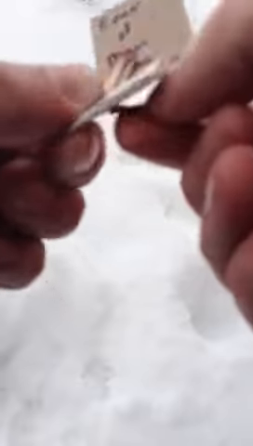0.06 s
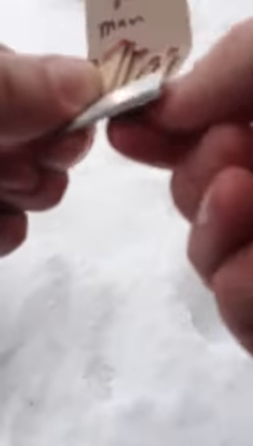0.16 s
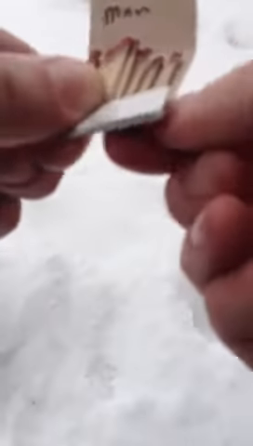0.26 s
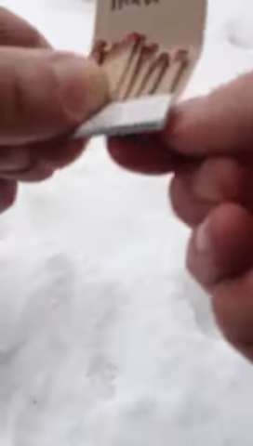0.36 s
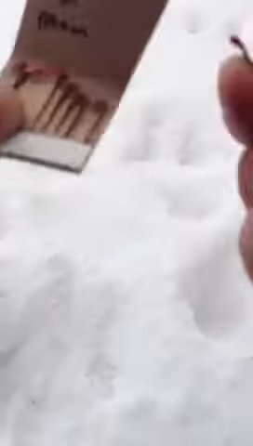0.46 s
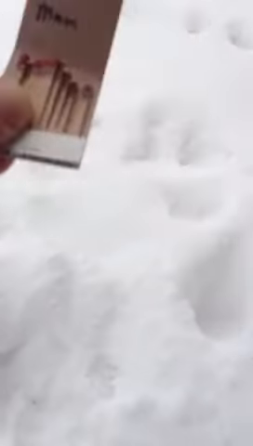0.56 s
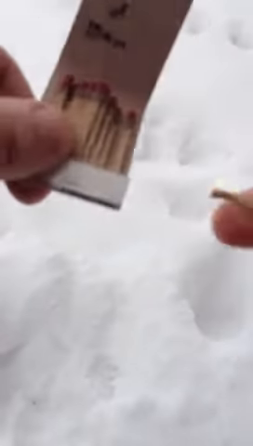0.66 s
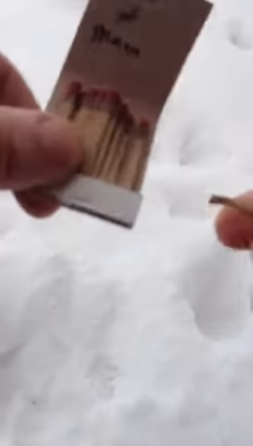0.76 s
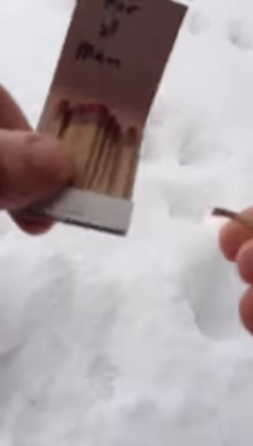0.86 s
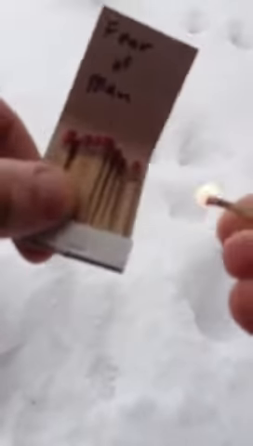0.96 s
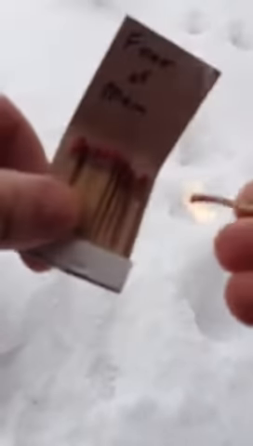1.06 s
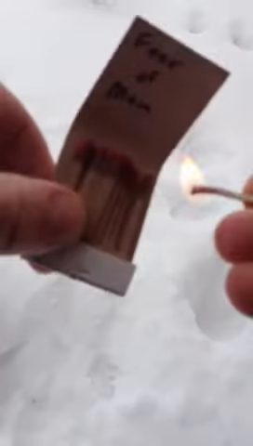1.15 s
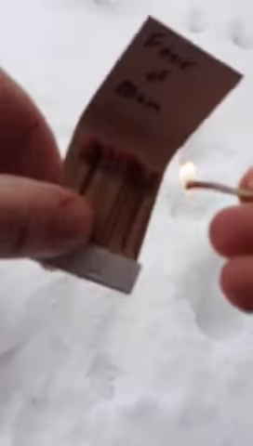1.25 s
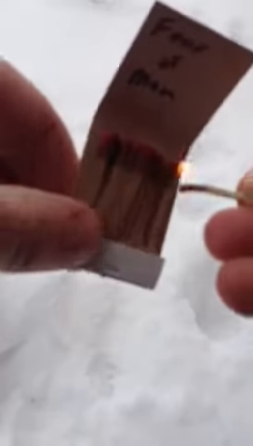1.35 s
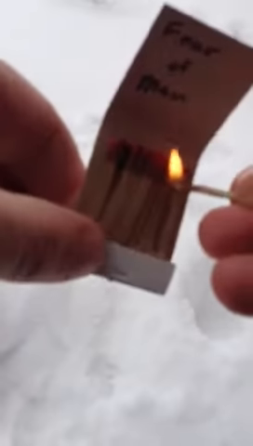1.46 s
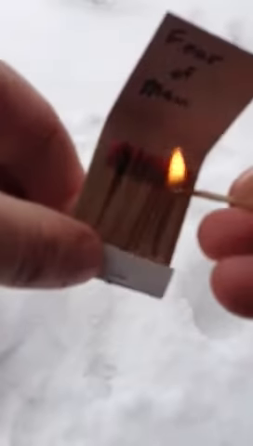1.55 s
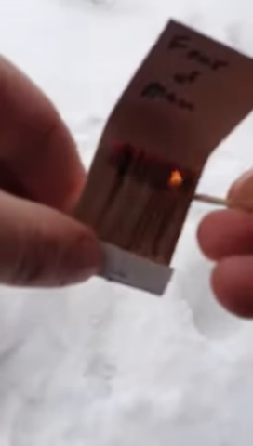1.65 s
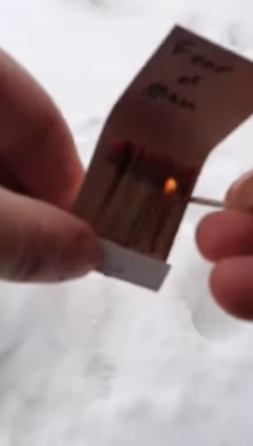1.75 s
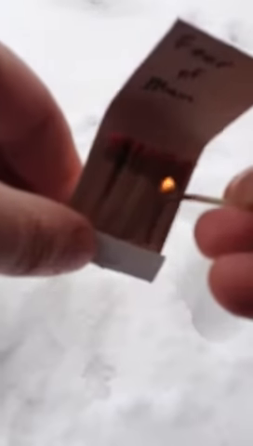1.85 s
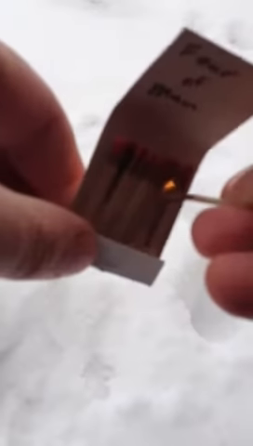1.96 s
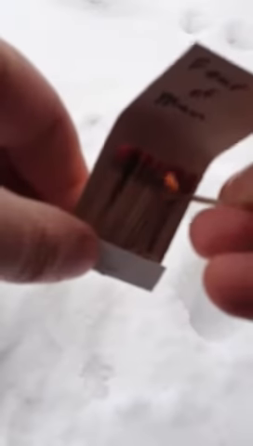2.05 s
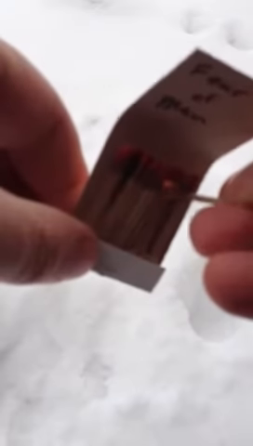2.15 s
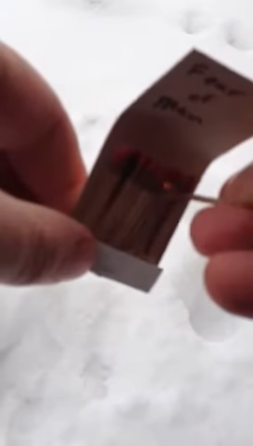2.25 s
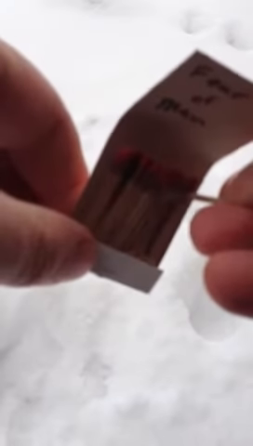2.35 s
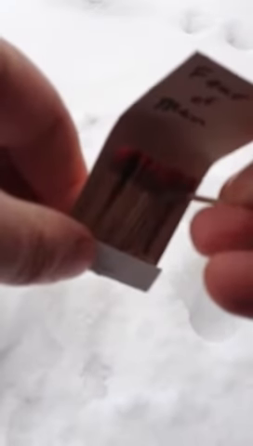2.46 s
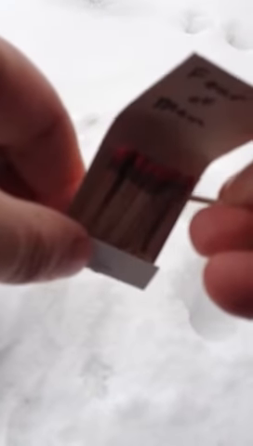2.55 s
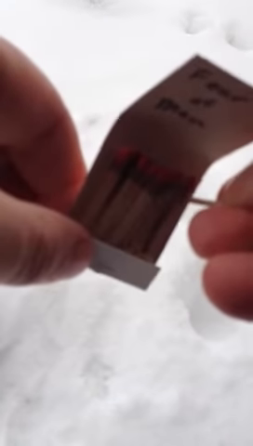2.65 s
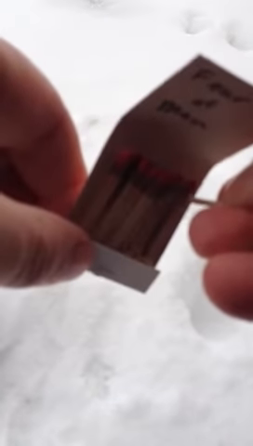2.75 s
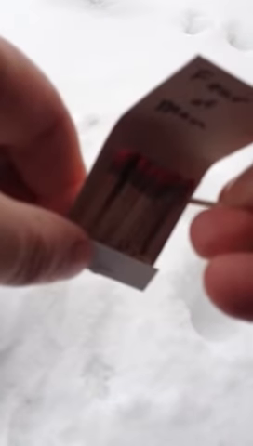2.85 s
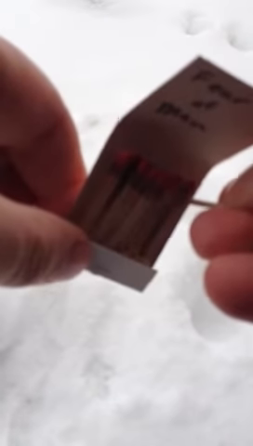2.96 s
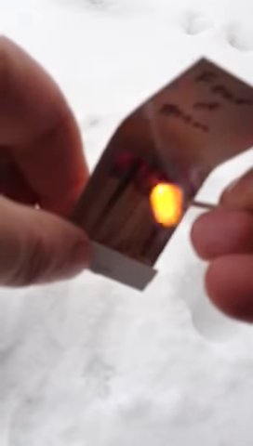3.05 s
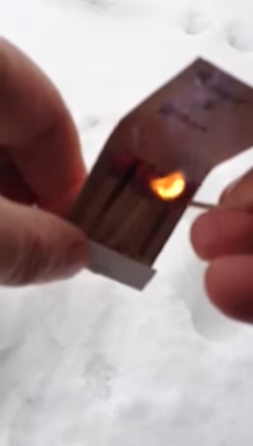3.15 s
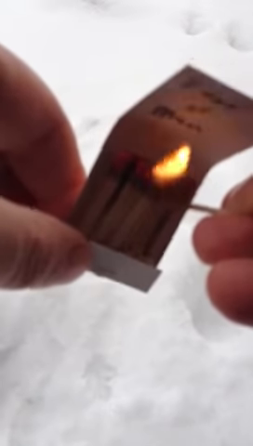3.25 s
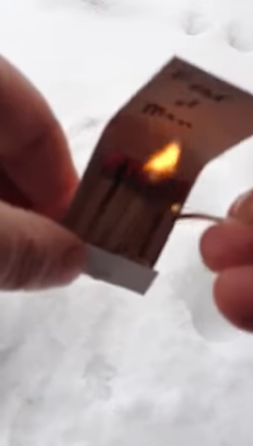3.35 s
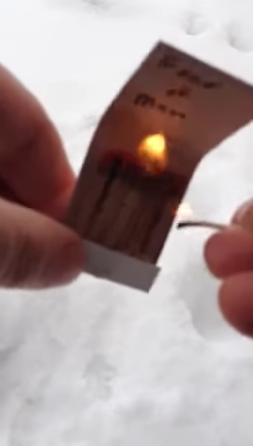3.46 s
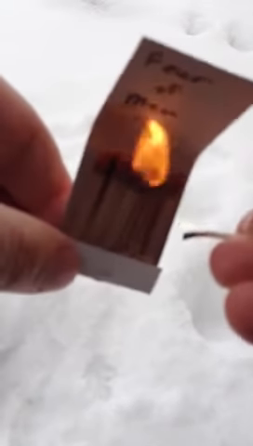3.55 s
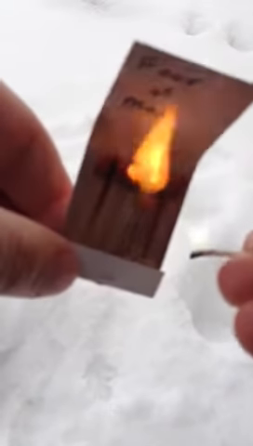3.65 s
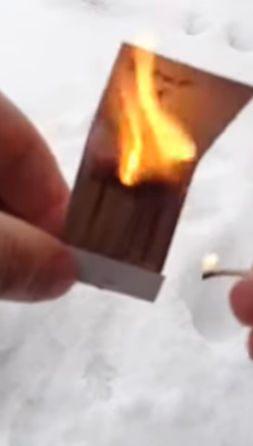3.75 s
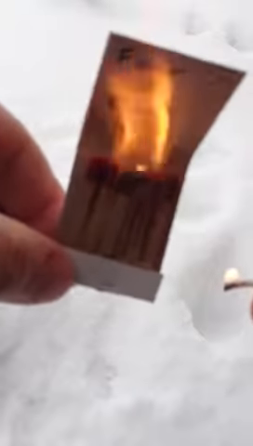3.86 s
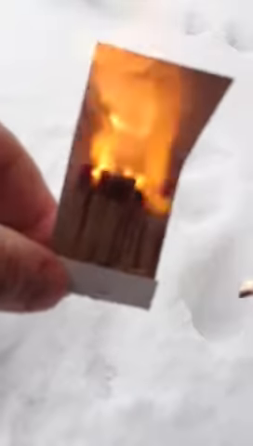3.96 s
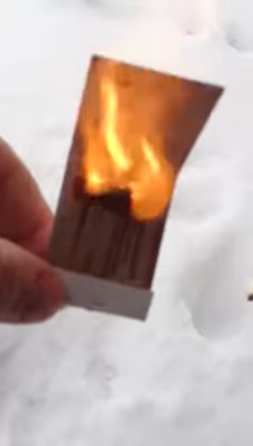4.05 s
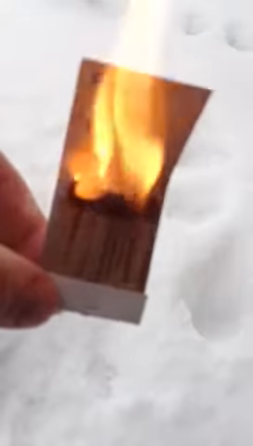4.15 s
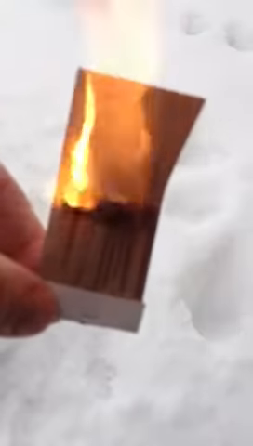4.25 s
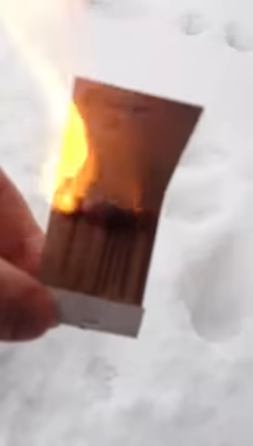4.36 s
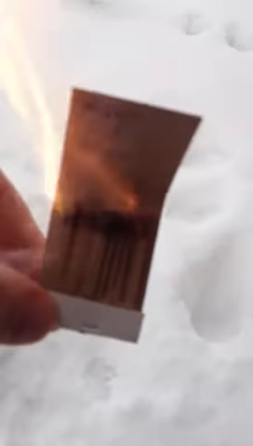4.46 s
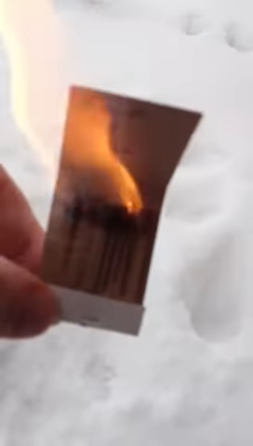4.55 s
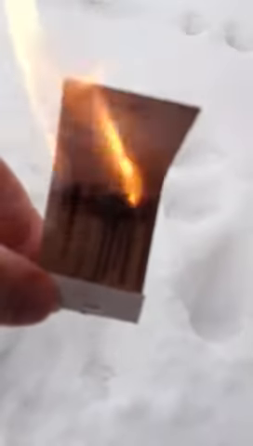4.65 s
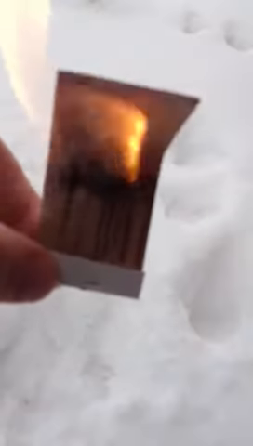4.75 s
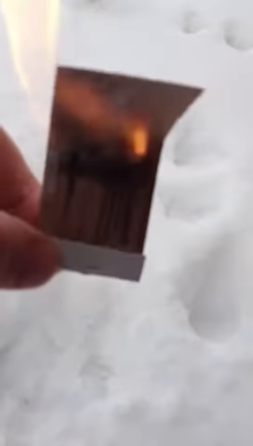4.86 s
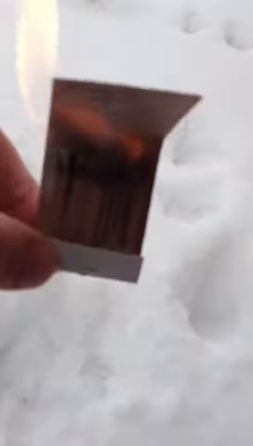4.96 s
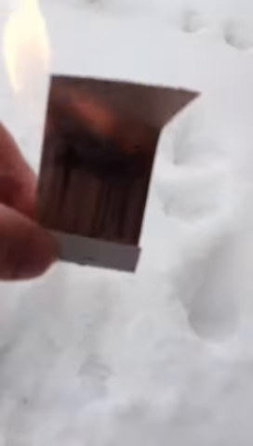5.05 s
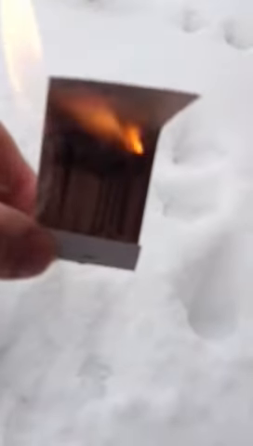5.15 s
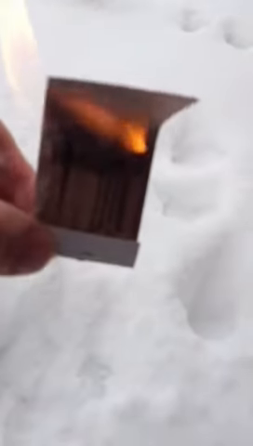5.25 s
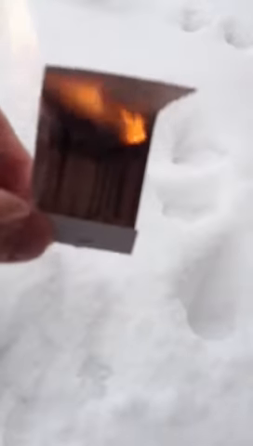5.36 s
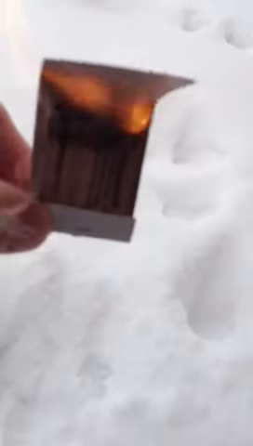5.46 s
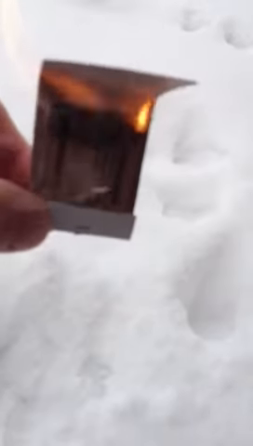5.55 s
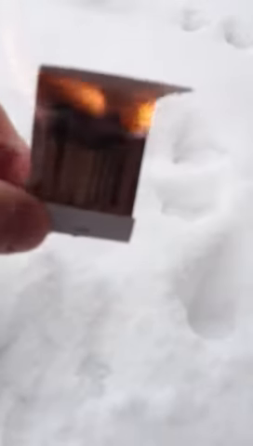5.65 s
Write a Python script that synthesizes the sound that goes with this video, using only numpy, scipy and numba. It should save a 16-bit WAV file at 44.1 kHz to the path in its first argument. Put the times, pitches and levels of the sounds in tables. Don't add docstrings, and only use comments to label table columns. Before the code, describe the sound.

Close, dry, nearly mono phone sound in open snowy air, with low distant traffic and soft hiss beneath. A tiny tick at 0.03 s, then faint rubbing of fingers and match on card from 0.1 s. At 0.43-0.53 s the match head rasps over the striker: a dense, gritty burst of cracks and woody knocks, the sharpest event. A weak, fluttering fizz follows in small puffs, fading by 1.7 s. A faint low motor tone drifts at 1.2-1.9 s. Quiet until 3 s, with small card snaps near 2.05 and 2.35 s, soft taps and a barely audible drone around 2.5-2.9 s. At 2.99 s the first head lights with a sudden spurting hiss, sputtering and snapping. From 3.58 s the row catches, swelling into a broad, steadier roaring hiss, peaking at 4-4.4 s with low puffs and spits. From 4.5 s it drops away to ragged flutters, duller after 4.8 s, with crackles to 5.7 s.

```python
import sys
import numpy as np
from scipy import signal
from scipy.fft import rfft, irfft
from scipy.io import wavfile
from scipy.ndimage import uniform_filter1d
from numba import njit

SR = 44100
rng = np.random.default_rng(int(sys.argv[2]) if len(sys.argv) > 2 else 0)


def dump(signal):
    limited = np.clip(np.atleast_2d(signal).T, -1, 1)
    pcm = np.round(limited * 32767).astype(np.int16)
    wavfile.write(sys.argv[1], SR, pcm)


def voltage_ratio(level):
    return 10 ** (np.asarray(level, float) / 20)


N = 252235

# frequency in Hz, density in dB per Hz.
JET_SPECTRA = [
    [(820, -45), (1400, -5.5), (2120, -8), (2700, 0), (3630, -2.5), (4600, 4), (5000, -7), (7180, -6.5),
     (9500, -19.5), (12400, -59.5)],
    [(820, -8.5), (1400, -10), (1590, -5), (1980, -20), (2340, -3.5), (2950, -2), (4700, 1), (5130, -13.5),
     (6950, -15.5), (7780, -28), (9500, -37), (20900, -78)],
    [(820, -6), (1400, -5), (1900, -7), (2380, -2), (3490, 0), (4660, -3.5), (5130, -10), (6160, -4.5),
     (7900, -13), (9500, -18), (12400, -51)],
    [(820, -40), (1400, -12.5), (1580, -5), (1910, -11.5), (2110, -8), (3500, -2.5), (4600, -2),
     (5050, -10.5), (6200, -6.5), (7530, -9), (9500, -26), (12400, -63)],
    [(820, -36), (1400, -24), (1550, -7), (1870, -10), (2110, -4.5), (2320, -7), (4160, 0), (5000, -14),
     (7180, -10), (9500, -30), (12400, -54)],
]
# time in seconds, stage 0-4.
STAGE = [
    (1.7, 0),
    (2.9, 1),
    (3.52, 1),
    (3.6, 2),
    (3.8, 2),
    (4.05, 3),
    (4.3, 3),
    (4.65, 4),
]
FLUTTER_BY_STAGE = (1.6, 1.16, 0.7, 0.41, 1.24)
SPECKS_DB_BY_STAGE = (-8, -7, -8, 1.5, -5.5)
ROAR_DB_BY_STAGE = (-5, -8, -6, -4.5, -6)
SIZZLE_DB_BY_STAGE = (-18.5, -17, -18, -15, -12)
# time in seconds, level in dB.
BLAZE = [
    (3.53, -56),
    (3.585, -39),
    (3.72, -36.5),
    (3.95, -36),
    (4.12, -35.5),
    (4.37, -36.5),
    (4.52, -45.5),
    (5.0, -53.5),
    (5.72, -55),
]
# start in seconds, length in seconds, level in dB, change until the end in dB.
MATCH_SPURTS = [(.535, 0.16, -61, -1), (0.706, .06, -54.5, -8), (0.788, 0.12, -65.5, 7),
                (0.892, 0.13, -57.5, -2), (1.011, 0.13, -51.5, -1.5), (1.054, 0.078, -50.5, -2),
                (1.146, 0.039, -56, 1), (1.196, 0.13, -70, 1), (1.321, 0.21, -60.5, -8.5),
                (1.546, 0.14, -63, -21)]
BOOK_SPURTS = [(2.988, .11, -40, 1), (3.098, 0.058, -41.5, 0), (3.158, 0.043, -46.5, -2),
               (3.2, 0.044, -45.5, 1.5), (3.255, 0.096, -50, 1.5), (3.357, 0.027, -45.5, -2.5),
               (3.401, 0.075, -51, -8), (3.469, 0.038, -53, -7), (3.503, 0.027, -52.5, -6),
               (3.545, .025, -51, 3), (3.573, 0.016, -40, -4), (3.6, 0.074, -43.5, 4.5),
               (3.98, 0.053, -35, -5.5), (4.235, 0.22, -42.5, -6), (4.491, 0.021, -37, -7.5),
               (4.55, 0.074, -44, 0.5), (4.61, 0.042, -47, 0.5), (4.66, 0.087, -45.5, -4),
               (4.765, 0.021, -44.5, -2.5), (4.835, 0.056, -48.5, -15), (4.93, 0.025, -52, 4.5),
               (5.1, 0.068, -58.5, 1), (5.168, 0.14, -46, -2.5), (5.26, 0.03, -47, 0),
               (5.32, 0.05, -54.5, 0.5), (5.385, 0.043, -45.5, -1.5), (5.438, 0.037, -44.5, -1),
               (5.515, 0.078, -52, 4.5), (5.62, 0.11, -63, 14)]
# start in seconds, length in seconds, from Hz, to Hz, depth 0-1.
NOTCHES = [(3.58, 0.35, 10700, 8700, 0.7), (3.85, 0.53, 8500, 8200, 0.46), (3.45, 0.35, 6000, 4900, 0.63),
           (2.96, 0.48, 7900, 9500, 0.9), (3.06, .34, 11000, 9200, 0.7), (3.95, 1.74, 5600, 5200, 0.34),
           (2.74, 1.58, 2360, 1530, 0.24)]
# start in seconds, length in seconds, centre in Hz, level in dB.
TONGUES = [(0.598, 0.024, 5600, -55.5), (.72, 0.047, 4600, -59), (.89, 0.053, 5600, -62.5),
           (0.968, 0.03, 5870, -62), (1.0, 0.1, 5800, -69), (1.06, 0.094, 6560, -75),
           (1.323, 0.044, 5060, -58), (1.332, 0.13, 7000, -73), (2.996, 0.14, 5670, -54),
           (3.008, 0.17, 1410, -60.5), (3.15, 0.092, 5950, -70), (3.268, 0.12, 5600, -64),
           (3.389, 0.19, 6000, -67), (3.602, 0.088, 6160, -54), (3.62, 0.051, 810, -50),
           (3.797, 0.19, 6000, -50), (3.97, 0.045, 930, -41), (3.989, 0.12, 4480, -40.5),
           (4.09, 0.048, 583, -41), (4.098, 0.078, 4260, -42), (4.178, 0.026, 790, -45),
           (4.234, 0.017, 392, -51), (4.2, 0.12, 3680, -44.5), (4.33, 0.14, 3640, -43),
           (3.82, 0.22, 4550, -46.5), (4.38, .05, 8300, -51), (4.298, 0.061, 506, -46),
           (4.364, 0.047, 710, -48.5), (4.5, 0.073, 7400, -57), (4.55, 0.12, 4030, -48.5),
           (4.691, 0.085, 3880, -63), (4.842, 0.016, 646, -55), (4.934, 0.035, 630, -58),
           (5.102, 0.035, 487, -53.5), (5.173, 0.089, 4060, -55), (5.39, .02, 790, -56),
           (5.451, 0.059, 690, -57), (5.543, 0.041, 4100, -63)]
# time in seconds, peak in dB, card thump in dB, fine grit in dB, T60 in seconds.
STRIKE = [(.4264, -34.5, -17.5, -30.5, 0.014), (.4413, -27.5, -17.5, -16.5, 0.0094),
          (.4470, -27, -16.5, -11.5, .006), (.4479, -9, -16, -12, 0.0082), (.4508, -8, -13.5, -7, 0.0057),
          (.4525, -22.5, -24, 2, 0.024), (.4553, -11, -12, -14, 0.014), (.4572, -16.5, -4, -11.5, 0.016),
          (.4590, -17.5, -12, -22.5, .0049), (.4612, -10, -18.5, -20, 0.023),
          (.4638, -11.5, -13.5, -17.5, 0.012), (.4665, -26, -20.5, -14.5, 0.032),
          (.4735, -3, -19, -11, 0.007), (.4745, -9.5, -13.5, -14, 0.014), (.4760, -7, -14.5, -18, .006),
          (.4772, -12.5, -14, -22, .012), (.4800, -30.5, -2.5, -22, .042), (.4840, -15, -21.5, -25, 0.012),
          (.4858, -12, -28, -22.5, .01), (.4900, -39, -15, -20, 0.04), (.4988, -29.5, -7, -6.5, .012),
          (.5012, -25, -17.5, -24.5, 0.017), (.5060, -40.5, -20, -14, 0.13),
          (.5278, -31, -18.5, -16.5, .012)]
# time in seconds, peak in dB, card thump in dB, fine grit in dB, T60 in seconds.
SNAPS = [(.0305, -30, -31, -36, 0.021), (2.0521, -26, -17, -29, 0.0045), (2.0672, -44.5, -16.5, -3, .02),
         (2.3458, -31.5, -16, -17, 0.0054), (2.3474, -40, -9, -18, 0.012),
         (2.9823, -37.5, -15, -27.5, 0.043), (2.9963, -37.5, -3.5, -19, 0.016),
         (3.3541, -24.5, -11.5, -24, 0.005), (3.4098, -30, -20, -25, 0.011),
         (3.4504, -21, -19.5, -28, 0.014), (3.4560, -31, -22, -28, 0.013), (3.4671, -26, -17, -17, 0.0099)]
# time in seconds, peak in dB, low range in dB.
TICKS = [(0.0755, -41, -15), (0.621, -31, -22), (0.65, -37, -14), (0.7139, -40, 1), (0.7429, -35, -4),
         (1.0175, -40, -12), (1.4407, -34, -25), (1.5702, -34, -29), (1.6134, -41, -18),
         (3.219, -23.5, -22), (3.234, -28, -11), (3.423, -33, -7), (3.4428, -41, -21), (3.502, -32, -20),
         (3.5222, -35, -26), (3.552, -31, -21), (3.576, -30, -15), (3.8995, -33, -24), (4.497, -21, -24),
         (4.771, -30, -6), (4.9289, -34, 1), (4.9538, -32, -4), (5.3971, -27, -3), (5.5228, -31, -26),
         (5.575, -27, -20), (5.589, -24.5, -18), (5.6088, -31, -4),
         (0.66, -38, -20), (.848, -45, -25), (1.039, -35, -12), (1.065, -37, -12), (1.085, -38, -12),
          (1.093, -38, -14), (1.096, -35, -14), (1.1205, -33, -12), (2.0495, -41, -25), (2.0945, -47, -25),
          (2.501, -46, -25), (2.541, -47, -25), (2.611, -44, -21), (2.921, -52, -28), (2.933, -50, -28),
          (4.4246, -26, -14.5), (4.6275, -27, -16), (4.7375, -35, -11), (4.9452, -34, -6),
          (5.053, -38, -14)]
SPITS = [(3.1973, -32, -15), (3.2462, -44, -14), (3.321, -35, -4), (3.58, -27, -13), (4.009, -30, -16),
         (4.25, -27, -14), (4.3024, -18, -20), (4.5194, -25, -17), (4.551, -33, -12), (4.655, -23, -17),
         (4.79, -35, -22), (4.8425, -30, -8), (4.8644, -37, -14), (4.884, -37, -17), (4.9794, -46, -12),
         (5.1711, -39, -15), (5.2033, -32, -8), (5.2744, -29, -10), (5.4594, -37, -26), (5.4698, -28, 0),
         (5.5069, -32, -2.5), (5.6444, -32, -17), (5.7009, -42, -4)]
# time in seconds, peak in dB,
# mode in Hz, T60 in seconds.
KNOCKS = [(.0306, -44, 2280, 0.017), (0.0313, -47, 4480, 0.01), (0.4266, -38, 4300, 0.015),
          (.428, -47, 155, 0.056), (0.4409, -33, 4800, .01), (0.4488, -20, 4400, .008),
          (.4552, -26, 607, 0.021), (0.4596, -15, 4600, 0.0088), (.473, -41, 204, .07),
          (0.4733, -5, 7300, 0.0035), (.4760, -14, 4380, 0.013), (.4745, -14.5, 2310, 0.017),
          (.831, -48, 600, .02), (2.0523, -45, 4500, .01), (2.346, -43.5, 513, 0.023),
          (2.3453, -54, 1300, .015), (2.639, -45.5, 1480, 0.028), (2.639, -49, 1060, .02),
          (2.346, -48, 330, 0.023), (2.9478, -48.5, 1549, 0.02), (.4553, -20.5, 1100, 0.011),
          (.4665, -28, 2300, .02), (2.3458, -45, 4470, .008), (3.3541, -36, 6260, .003),
          (3.4504, -35, 6270, .003), (3.4506, -42, 900, 0.0054)]
# time in seconds, level in dB.
RUB = [
    (0.09, -66),
    (0.16, -61.5),
    (0.41, -58),
]
# frequency in Hz, density in dB per Hz.
ROAR_SPECTRUM = [(41, -45), (70, -28.5), (145, -4.5), (265, -1.5), (393, -1), (850, 1), (1130, -1),
                 (1390, -10), (2000, -12.5), (2600, -52), (4400, -120)]
SIZZLE_SPECTRUM = [(5000, -23), (8500, -1.5), (9910, -8), (12800, -3), (14500, -2.5), (15200, -10)]
GRIT_SPECTRUM = [(820, -33), (1400, -15), (1590, -8), (1770, -18), (2340, 0.5), (3000, -4), (4230, 2),
                 (5780, -4), (6900, -2.5), (8360, -11), (9500, -29), (12400, -43), (20900, -120)]
CARD_SPECTRUM = [(35, -51.5), (60, -29.5), (221, -4), (288, -6), (794, -0.5), (867, 1.5), (1000, -3),
                 (2000, -11), (2600, -25.5), (4400, -120)]
SNAP_SPECTRUM = [(820, -21), (1500, -14), (2300, -10), (3200, 0.5), (4400, 3.5), (5300, -9.5), (6950, -11),
                 (8200, -31), (12000, -49)]
RUBBING_SPECTRUM = [(240, -37.5), (400, -4), (576, -0.5), (723, -12), (907, -2), (1070, -23), (1770, -22),
                    (2220, -4), (2830, -15), (4600, -9.5), (5110, -19), (9520, -28), (15000, -48)]
AIR_SPECTRUM = [(12, -67.5), (20, -35), (80, -14), (136, -1), (190, -0.5), (238, -7.5), (289, -1),
                (332, -8), (595, -9), (1330, -21), (3940, -24.5), (6690, -28), (9600, -40.5), (14200, -32),
                (15400, -34)]
# peak in seconds, rise in seconds, fall in seconds, lift in dB.
SMOULDER = [
    (.5, 1.1, 0.86, 6.5),
    (2.75, 0.49, 0.38, 2),
]
# time in seconds, pitch in Hz, level in dB.
MOTOR = [
    (1.2, 184.4, -62),
    (1.45, 179.5, -60),
    (1.76, 182, -58),
    (1.88, 172.7, -75),
]
DRONE = [
    (2.45, 287, -78),
    (2.55, 293, -63),
    (2.62, 290, -86),
    (2.68, 293.8, -63.5),
    (2.91, 293, -67),
    (2.98, 297, -80),
]
# start in seconds, length in seconds, from Hz, to Hz, width in Hz.
GAPS = [(.58, .07, 5050, 5050, 200), (1.1, .11, 5150, 5050, 200), (1.58, .14, 8900, 8600, 250),
        (3.01, .1, 7500, 7450, 250), (3.13, .13, 8250, 7900, 400), (3.56, .4, 2050, 1900, 80),
        (3.58, .16, 10050, 9800, 350), (3.63, .12, 9550, 9450, 600), (3.66, .07, 9800, 9750, 500),
        (3.67, .05, 10900, 10850, 300), (3.7, .11, 5100, 5050, 200), (3.73, .07, 9300, 8800, 600),
        (4.1, .35, 5700, 5450, 120), (3.95, .2, 7300, 7050, 120), (3.78, .06, 13000, 13000, 450),
        (3.83, .11, 12650, 12600, 200), (3.8, .06, 10700, 10500, 250), (3.82, .27, 8500, 8150, 150),
        (4.0, .12, 5100, 5050, 100), (4.26, .08, 8200, 8150, 400), (4.39, .11, 12800, 12800, 550),
        (4.4, .12, 13900, 13800, 250), (4.42, .08, 10300, 10100, 300), (4.54, .08, 8200, 8100, 200),
        (4.7, .25, 5000, 5000, 120), (5.48, .22, 5000, 4950, 150), (5.6, .1, 7800, 7700, 200)]
# start in seconds, end in seconds, low edge in Hz, high edge in Hz, level in dB.
SIDE_PATCHES = [
    (3.692, 3.72, 4100, 5600, -54),
    (3.971, 4.002, 4200, 4970, -39),
]

MIDDLING_DB = -51
ROAR_FOLLOWS, SIZZLE_FOLLOWS = 0.87, 0.78
ROAR_LAG_S = 0.0035
SPENT_S, SIZZLE_FADE_DB_PER_S, ROAR_GAIN_DB_PER_S = 4.81, -8.5, 2
LIGHT_S, DIE_S = 0.0098, 0.02
NOTCH_WIDTH, NOTCH_FADE_S = 0.27, 0.15
TONGUE_WIDTH, TONGUE_EDGE_S = 0.18, 0.013
STRIKE_HALF_SNAP_S, SNAPS_HALF_SNAP_S = 0.0083, 0.02
TICK_TOP_DB, TICK_T60_S, TICK_SNAP = -27, 0.01, 0.64
AIR_DB, HISS_DB = -59.5, -1
GAP_FADE_S = 0.014
TOP_HZ = 15290


def flame():
    stage = curves(STAGE)[0]

    def by_stage(row):
        return np.interp(stage, np.arange(len(JET_SPECTRA)), row)

    puffs_db = by_stage(FLUTTER_BY_STAGE) * (0.3 * walk(45) + 1.63 * walk(250))
    specks = crystals(150, 18.0) * voltage_ratio(by_stage(SPECKS_DB_BY_STAGE))
    gas = turbulence(puffs_db + 0.5 * walk(25), specks)
    jet = np.zeros(N)
    for k, spectrum in enumerate(JET_SPECTRA):
        share = np.clip(1 - abs(stage - k), 0, 1)
        jet += share * colour(gas, spectrum)
    roar = colour(turbulence(0.58 * puffs_db + 1.33 * walk(20), 0.5 * specks), ROAR_SPECTRUM)
    sizzle = colour(turbulence(0.39 * puffs_db + 0.64 * walk(25), specks), SIZZLE_SPECTRUM)

    flow = gas_flow() / voltage_ratio(MIDDLING_DB)
    keep = np.exp(-1 / (ROAR_LAG_S * SR))
    body = signal.lfilter([1 - keep], [1, -keep], flow)
    spent_s = np.maximum(np.arange(N) / SR - SPENT_S, 0)
    roar_gain = voltage_ratio(by_stage(ROAR_DB_BY_STAGE) + ROAR_GAIN_DB_PER_S * spent_s)
    sizzle_gain = voltage_ratio(by_stage(SIZZLE_DB_BY_STAGE) + SIZZLE_FADE_DB_PER_S * spent_s)
    mix = flow * jet
    mix = mix + roar_gain * body ** ROAR_FOLLOWS * roar
    mix = mix + sizzle_gain * flow ** SIZZLE_FOLLOWS * sizzle
    return cover_echo(voltage_ratio(MIDDLING_DB) * mix)


def gas_flow():
    t = np.arange(N) / SR
    blaze_db, gate = curves(BLAZE)
    power = (gate * voltage_ratio(blaze_db)) ** 2
    for s, length, db, change_db in MATCH_SPURTS + BOOK_SPURTS:
        i, j = int(s * SR), int((s + length + DIE_S) * SR)
        u = t[i:j] - s
        edge = np.clip(np.minimum(u / LIGHT_S, (length + DIE_S - u) / DIE_S), 0, 1)
        power[i:j] += (edge * voltage_ratio(db + change_db * u / length)) ** 2
    return np.sqrt(power)


def cover_echo(x):
    t = np.arange(N) / SR
    for s, length, from_hz, to_hz, depth in NOTCHES:
        hz = np.interp(t, (s, s + length), (from_hz, to_hz))
        fade = np.clip(np.minimum(t - s, s + length - t) / NOTCH_FADE_S, 0, 1)
        x = x - depth * fade * band(x, hz, NOTCH_WIDTH * from_hz)
    for centre_hz in (900, 2900, 4100, 6600, 7300, 9300, 10800, 12500, 14000):
        depth = 0.35 if centre_hz < 8000 else 0.5
        sway = np.clip(walk(6), -2, 2)
        x = x + depth * sway * band(x, centre_hz * (1 + 0.06 * walk(4)), 0.1 * centre_hz)
    for centre_hz in range(5300, 15000, 800):
        dip = np.clip(walk(12) - 0.6, 0, 1)
        x = x - dip * band(x, centre_hz + 250 * walk(3), 300.)
    return x


def tongues():
    out = np.zeros(N)
    for s, length, hz, db in TONGUES:
        u = np.arange(int((length + 2 * TONGUE_EDGE_S) * SR)) / SR
        hiss = band(rng.standard_normal(len(u)), np.full(len(u), float(hz)), TONGUE_WIDTH * hz)
        hiss = hiss / np.sqrt(np.pi * TONGUE_WIDTH * hz / SR)
        edge = np.clip(np.minimum(u, (u[-1] - u) / 2) / TONGUE_EDGE_S, 0, 1)
        i = int(s * SR)
        out[i:i + len(u)] += voltage_ratio(db) * edge * hiss
    return out * voltage_ratio(1.7 * walk(120))


def cracks(events, spectra, trim_db):
    t = np.arange(4096) / SR
    drive = np.zeros((3, N + 4096))
    for s, db, low_db, top_db, t60, snap in events:
        grit = rng.standard_normal(4096)
        burst = 0.47 * (1 - snap) * grit * np.exp(-np.log(1000) * t / t60)
        burst[0] = 2.67 * snap
        i = int(s * SR)
        drive[:, i:i + 4096] += voltage_ratio(db + np.array([[0], [low_db], [top_db]])) * burst
    return sum(voltage_ratio(db) * colour(x[:N], c) for x, c, db in zip(drive, spectra, trim_db))


def with_snap(rows, half_s):
    return [(*row, half_s / (half_s + row[-1])) for row in rows]


def spitting(rows, jet_spectrum):
    events = [(*row, TICK_TOP_DB, TICK_T60_S, TICK_SNAP) for row in rows]
    return cracks(events, (jet_spectrum, ROAR_SPECTRUM, SIZZLE_SPECTRUM), (-3, 1.5, 1.5))


def knocks():
    out, t = np.zeros(N), np.arange(4096) / SR
    for s, db, hz, t60 in KNOCKS:
        ring = np.sin(2 * np.pi * hz * t) + 0.18 * np.sin(2 * np.pi * 0.88 * hz * t)
        i = int(s * SR)
        out[i:i + 4096] += voltage_ratio(db) * ring * np.exp(-np.log(1000) * t / t60)
    return signal.sosfilt(signal.butter(2, 90, "high", fs=SR, output="sos"), out)


def rubbing():
    db, gate = curves(RUB)
    grit = turbulence(2.6 * walk(60.1), crystals(200, 7.7))
    return gate * voltage_ratio(db) * colour(grit, RUBBING_SPECTRUM)


def motor(table, wobble_hz, swell_db):
    hz, db, gate = curves(table)
    phase = 2 * np.pi * np.cumsum(hz + wobble_hz * walk(15)) / SR
    return np.sqrt(2) * gate * voltage_ratio(db + swell_db * walk(25.6)) * np.sin(phase)


def air():
    t = np.arange(N) / SR
    lift_db = np.zeros(N)
    for s, rise, fall, db in SMOULDER:
        lift_db += np.interp(t, (s - rise, s, s + fall), (0, db, 0))
    both = colour(voltage_ratio(AIR_DB) * rng.standard_normal(N), AIR_SPECTRUM)
    low = signal.sosfilt(signal.butter(2, 1200, fs=SR, output="sos"), both)
    high = signal.sosfilt(signal.butter(2, 1200, "high", fs=SR, output="sos"), both)
    return low * voltage_ratio(0.62 * walk(7.6)) - high * voltage_ratio(HISS_DB + lift_db + 0.62 * walk(15.0))


def side_noise():
    t, out = np.arange(N) / SR, np.zeros(N)
    for start, end, low_hz, high_hz, db in SIDE_PATCHES:
        sos = signal.butter(6, (low_hz, high_hz), "band", fs=SR, output="sos")
        patch = signal.sosfilt(sos, rng.standard_normal(N))
        fade = np.clip(np.minimum(t - start, end - t) / 0.0072, 0, 1)
        out += voltage_ratio(db) * patch / np.std(patch) * fade
    return out * np.array([[1], [-1]])


def gaps(x):
    x = x.copy()
    for s, length, from_hz, to_hz, width_hz in GAPS:
        i, j = int(s * SR), int((s + length) * SR)
        u = np.arange(j - i) / SR
        hz = from_hz + (to_hz - from_hz) * u / length
        fade = np.clip(np.minimum(u, length - u) / GAP_FADE_S, 0, 1)
        for _ in range(3):
            x[i:j] -= fade * band(x[i:j].copy(), hz, float(width_hz))
    return x


def turbulence(flutter_db, specks):
    x = (rng.standard_normal(N) + specks) * voltage_ratio(flutter_db)
    return x / np.std(x)


def crystals(rate_hz, db):
    return (rng.random(N) < rate_hz / SR) * voltage_ratio(db) * rng.uniform(-0.35, 1, N)


def walk(rate_hz):
    k = max(int(SR / rate_hz), 1)
    held = np.repeat(rng.standard_normal(N // k + 1), k)
    return 1.2 * uniform_filter1d(held, k)[:N]


def curves(table):
    s, *columns = np.transpose(table)
    t = np.arange(N) / SR
    gate = np.clip(np.minimum(t - s[0], s[-1] + 0.011 - t) / 0.0052, 0, 1)
    return [np.interp(t, s, c) for c in columns] + [gate]


def colour(x, points):
    size = 2048
    low_end = (points[0][0] / 2, points[0][1] - 30)
    hz, db = np.transpose([low_end, *points])
    grid_hz = np.maximum(np.arange(size // 2 + 1) * SR / size, 1)
    cepstrum = irfft(np.interp(np.log(grid_hz), np.log(hz), db) * np.log(10) / 20)
    cepstrum[1:size // 2] *= 2
    cepstrum[size // 2 + 1:] = 0
    taps = irfft(np.exp(rfft(cepstrum)))[:size // 2]
    return signal.fftconvolve(x, taps / np.sqrt(np.sum(taps ** 2)))[:len(x)]


@njit
def band(x, hz, width_hz):
    y, b, l = np.empty(len(x)), 0., 0.
    for i in range(len(x)):
        g, k = np.tan(np.pi * hz[i] / SR), width_hz / hz[i]
        v = (b + g * (x[i] - l)) / (1 + g * (g + k))
        b, l, y[i] = 2 * v - b, l + 2 * g * v, k * v
    return y


def scene():
    strike = cracks(with_snap(STRIKE, STRIKE_HALF_SNAP_S),
                    (GRIT_SPECTRUM, CARD_SPECTRUM, SIZZLE_SPECTRUM), (1.5, 6, 4))
    snaps = cracks(with_snap(SNAPS, SNAPS_HALF_SNAP_S),
                   (SNAP_SPECTRUM, ROAR_SPECTRUM, SIZZLE_SPECTRUM), (1.5, 6, 4))
    ticks = spitting(TICKS, JET_SPECTRA[1])
    spits = spitting(SPITS, JET_SPECTRA[3])
    near = flame() + tongues() + strike + snaps + ticks + spits + knocks() + rubbing()
    far = air() + motor(MOTOR, 1.2, 0.6) + motor(DRONE, 3.94, 1.2)
    return np.tile(gaps(near + far), (2, 1))


def band_limit(x):
    return signal.sosfilt(signal.butter(12, 16400, fs=SR, output="sos"), x)


def record(dry):
    rounded = np.tanh(1.3 * dry) / 1.3
    soft = signal.sosfilt(signal.butter(2, 45, "high", fs=SR, output="sos"), rounded)
    top_cut = signal.ellip(10, 0.2, 70, TOP_HZ, fs=SR, output="sos")
    mix = signal.sosfilt(top_cut, soft + side_noise())
    return band_limit(mix)


dry = scene()
out = record(dry)
dump(out)
```